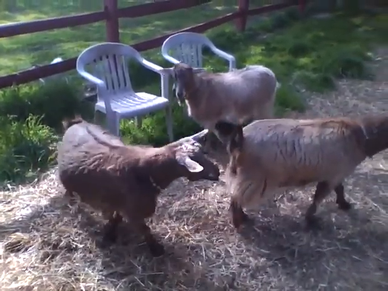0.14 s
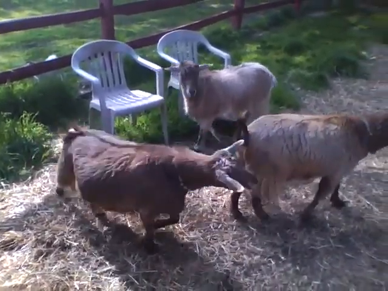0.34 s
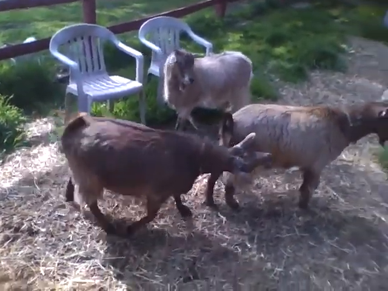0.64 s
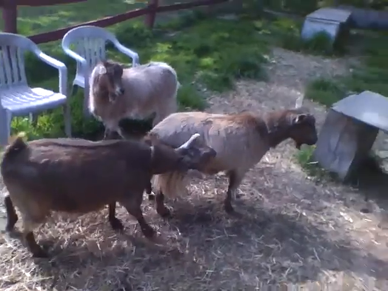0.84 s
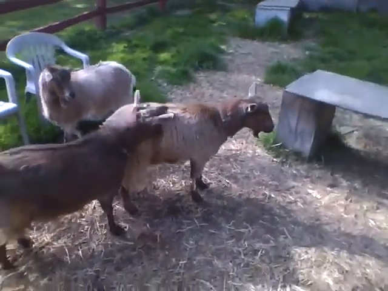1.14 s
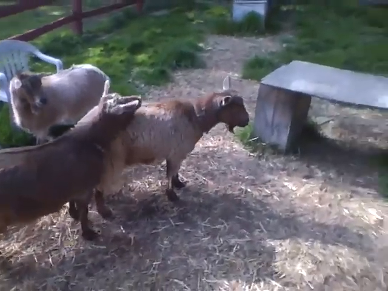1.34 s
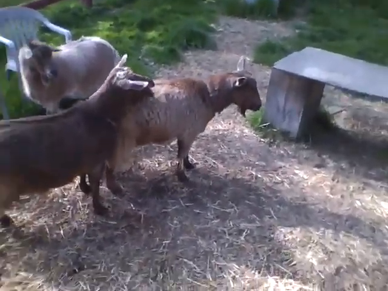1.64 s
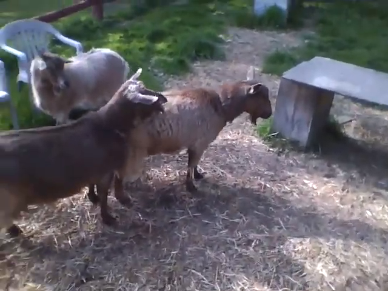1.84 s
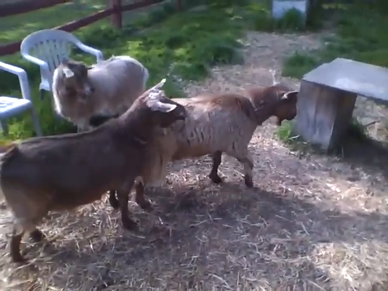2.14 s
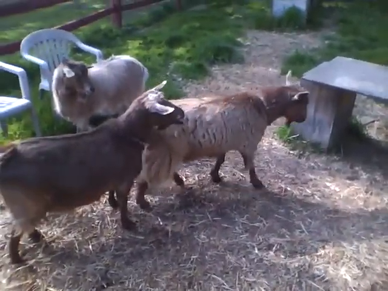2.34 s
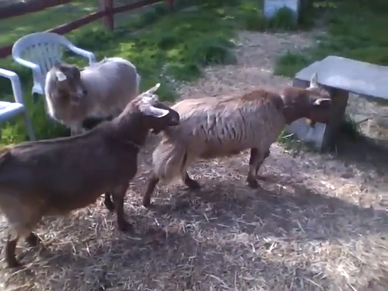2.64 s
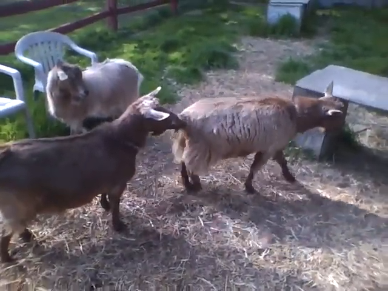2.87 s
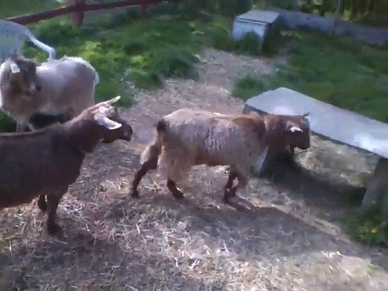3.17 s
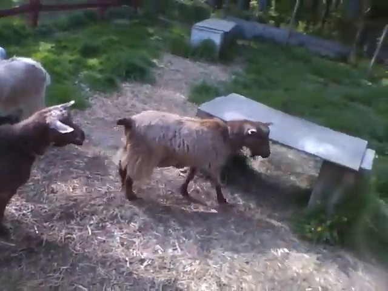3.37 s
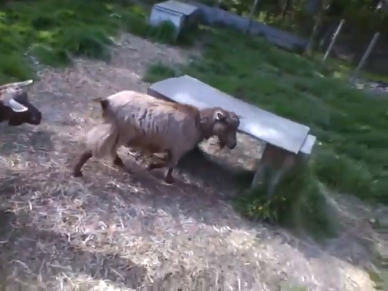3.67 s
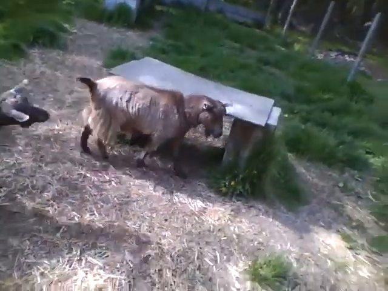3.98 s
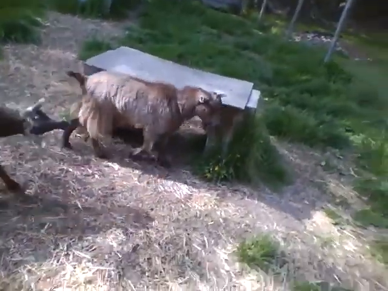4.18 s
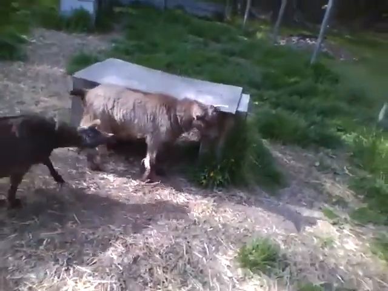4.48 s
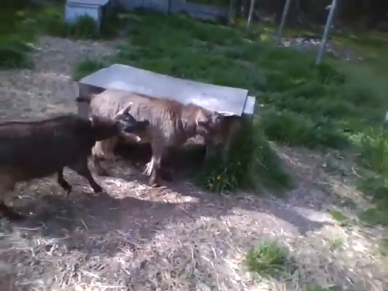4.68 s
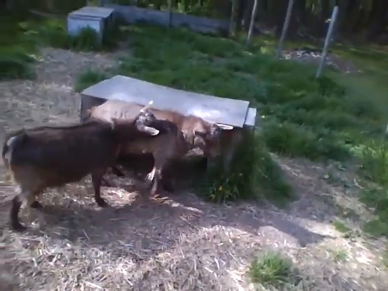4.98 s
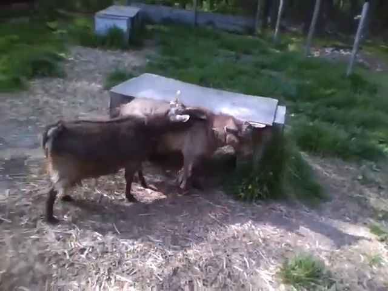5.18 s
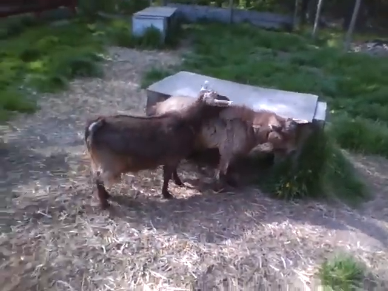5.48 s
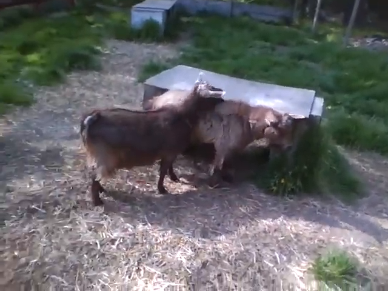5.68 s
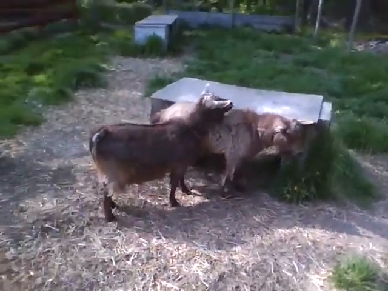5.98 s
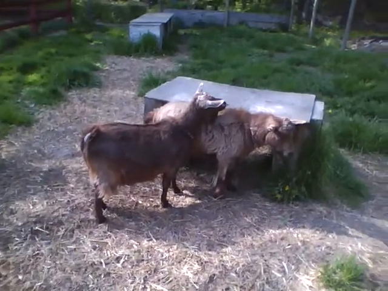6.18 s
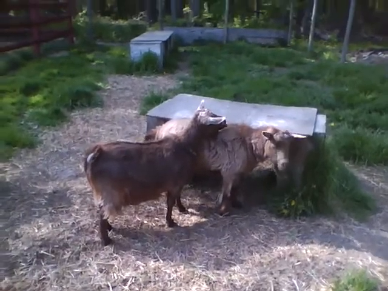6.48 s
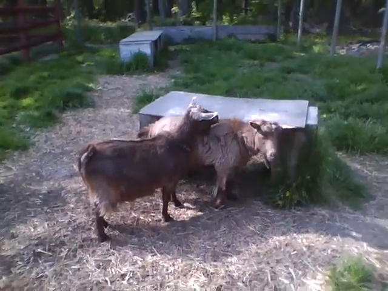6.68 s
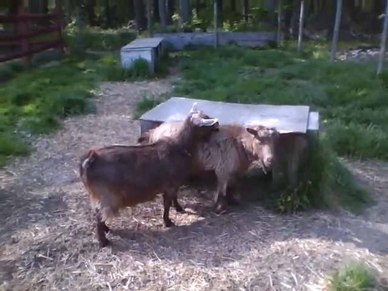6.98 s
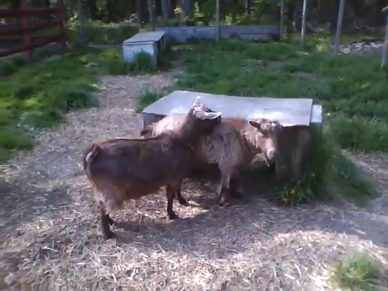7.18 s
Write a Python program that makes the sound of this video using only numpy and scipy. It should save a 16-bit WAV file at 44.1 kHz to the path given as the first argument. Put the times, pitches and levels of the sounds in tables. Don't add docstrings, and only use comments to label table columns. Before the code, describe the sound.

A goat close by gives a short hoarse stuttering bleat, then a longer broken one, amid crackling straw, hoof knocks and faint birds.

```python
import sys
import numpy as np
from scipy import signal
from scipy.fft import rfft, irfft
from scipy.io import wavfile
from scipy.ndimage import uniform_filter1d

SR = 44100
rng = np.random.default_rng(int(sys.argv[2]) if len(sys.argv) > 2 else 0)


def nominal_scale(level):
    x = np.asarray(level, float) / 20
    return 10 ** x


def dump(signal):
    limited = np.clip(np.atleast_2d(signal).T, -1, 1)
    pcm = np.round(limited * 32767).astype(np.int16)
    wavfile.write(sys.argv[1], SR, pcm)


N = 322812

FOLDS_HZ = 229
ATTACK_S, RELEASE_S, TAIL_S = 0.012, 0.011, 0.019
SHUT_DB = -48


def evened(x):
    return x / np.sqrt(np.mean(x ** 2) + 1e-20)


def smooth_twice(x, size):
    return uniform_filter1d(uniform_filter1d(x, size), size)


def add(mix, s, sound):
    part = mix[round(s * SR):][:len(sound)]
    part += sound[:len(part)]


def read(points, hz):
    f, value = np.transpose(points)
    return np.interp(np.log(hz + 1), np.log(f + 1), value)


def resonate(x, hz, width):
    turn = np.exp(2j * np.pi * np.cumsum(hz * np.ones(len(x))) / SR)
    r = np.exp(-np.pi * width / SR)
    return 2 * (turn * signal.lfilter([1 - r], [1, -r], x / turn + 1e-18)).real


def noise(spectrum, patchy_db):
    frames, hz = N // 128 + 5, np.fft.rfftfreq(512, 1 / SR)
    a, b, patches = rng.standard_normal((frames, 257, 3)).T
    patches = evened(uniform_filter1d(uniform_filter1d(patches, 16, 0), 12, 1))
    z = (a + 1j * b) * nominal_scale(read(spectrum, hz)[:, None] + patchy_db * patches)
    return evened(signal.istft(z, nperseg=512, noverlap=384)[1][:N])


def background():
    # pitch_hz, level_db [dB per Hz]
    hiss_colour = [(13, -56), (22, -28.5), (87, -5.5), (156, -20), (189, -4), (286, -15.5), (469, -13),
                   (815, -13.5), (988, -9.5), (1410, -18.5), (4140, -19.5), (4760, -20.5), (16000, -24)]
    # pitch_hz, level_db
    hum_lines = [(188.4, -71.5), (495.3, -92.5)]
    # time_s, level_db
    rumble = [(0.0, -68), (0.35, -65.5), (0.79, -63), (1.24, -63.5), (1.34, -62), (2.47, -69), (3.65, -69),
              (4.18, -57.5), (4.47, -64), (4.89, -62), (6.08, -63.5), (6.4, -65.5), (6.56, -63),
              (7.32, -68)]
    hums = sum(nominal_scale(db) * evened(resonate(rng.standard_normal(N), hz, 4.9)) for hz, db in hum_lines)
    air = nominal_scale(-56.5) * noise(hiss_colour, patchy_db=0.97)
    low = signal.sosfiltfilt(signal.butter(2, 500, fs=SR, output="sos"), air)
    s, db = np.transpose(rumble)
    swell = nominal_scale(np.interp(np.arange(N) / SR, s, db - db[-1]))
    no_subsonic = signal.butter(2, 35, "high", fs=SR, output="sos")
    return signal.sosfilt(no_subsonic, air - low + swell * (low + hums))


def rustle():
    # pitch_hz, level_db [dB per Hz]
    straw_colour = [(710, -50), (1200, -8.5), (1310, -2.5), (1750, -3.5), (2530, -3.5), (3400, -3),
                    (6370, -0.5), (16000, -7)]
    # peak_s, level_db, rise_s [over 20 dB], fall_s [over 20 dB]
    steps = [(0.189, -52, 0.85, 0.86), (.59, -49.5, 0.31, 0.065), (.9, -47, 0.8, 0.34),
             (1.076, -50, 0.11, 0.086), (1.236, -59.5, 0.25, 0.19), (1.96, -64.5, 0.19, 0.46),
             (2.21, -57, 0.049, 0.38), (2.48, -52.5, 0.071, 0.11), (2.66, -61, 0.18, 1.3),
             (3.03, -53.5, 0.022, 0.3), (3.28, -54, 0.2, 0.72), (3.61, -60.5, 0.13, 0.35),
             (3.869, -50.5, 0.23, 0.44), (4.0, -50, .08, 0.16), (4.17, -49, 0.15, 1),
             (4.42, -51.5, .3, 0.89), (4.82, -46.5, 0.08, 0.043), (4.95, -60, 0.042, .06),
             (5.1, -56, 0.19, 0.27), (5.488, -55.5, 0.03, 0.069)]
    cracks = nominal_scale(8.2 * np.minimum(rng.exponential(1, N), 5))
    cracks = cracks * (rng.random(N) < 300 / SR)
    grain = 1 + 0.251 * evened(signal.lfilter([1], [1, -0.97], cracks))
    slips = nominal_scale(2.1 * evened(smooth_twice(rng.standard_normal(N), 900)))
    t, power = np.arange(N) / SR, 0
    for s, db, rise, fall in steps:
        fade_db = 20 * np.maximum((s - t) / rise, (t - s) / fall)
        power = power + nominal_scale(2 * (db + 1.5 - fade_db))
    return np.sqrt(power) * evened(grain * slips * noise(straw_colour, patchy_db=0.7))


def birds(mix):
    # time_s, pitch_hz, level_db
    whistles = [
        [(2.38, 4670, -68.5), (2.4, 4580, -54.5), (2.42, 4300, -66)],
        [(2.405, 4260, -66), (2.46, 3980, -62), (2.54, 4170, -62), (2.6, 4050, -60.5), (2.68, 3990, -65.5),
         (2.76, 4220, -69)],
        [(0.02, 2420, -69.5), (0.03, 2490, -63), (0.192, 2550, -67), (0.2, 2735, -76)],
        [(2.39, 2250, -70.5), (2.42, 2030, -71), (2.52, 2080, -67.5), (2.555, 2060, -75), (2.6, 2030, -61),
         (2.63, 2010, -69)],
        [(2.42, 2470, -70), (2.46, 2450, -68.5), (2.49, 2490, -76), (2.53, 2490, -64.5), (2.55, 2500, -74)],
        [(2.15, 2550, -72), (2.27, 2590, -69.5)],
        [(6.32, 515, -76), (6.356, 514, -59), (6.4, 518, -69.5)],
        [(6.5, 610, -67.5), (6.528, 610, -60), (6.56, 600, -66)],
    ]
    for rows in whistles:
        s, *columns = np.transpose(rows)
        t = np.arange(s[0], s[-1], 1 / SR)
        hz, db = (np.interp(t, s, c) for c in columns)
        add(mix, s[0], whistle(hz, db))


def whistle(hz, db):
    breath = resonate(rng.standard_normal(len(hz)), hz, 0.024 * hz.mean())
    tone = resonate(breath, hz, 0.04 * hz.mean())
    tone = tone / np.sqrt(abs(uniform_filter1d(tone ** 2, size=900)) + 1e-12)
    return nominal_scale(db) * tone * signal.windows.tukey(len(hz), 0.05)


def snap(db, hz):
    t, f = np.arange(1024) / SR, np.fft.rfftfreq(1024, 1 / SR)
    crack = 0.12 * rng.standard_normal(1024) * nominal_scale(-60 * abs(t - 0.002) / 0.009)
    crack[60] += 1
    octaves_off = np.log2((f + 1) / hz)
    crack = irfft(rfft(crack) * np.exp(-abs(octaves_off / 1.3) ** 1.5))
    return nominal_scale(db) * crack / abs(crack).max()


def bump(db):
    u = (np.arange(2400) / SR - 0.014) / 0.0032
    return -nominal_scale(db + 1.0) * (1 - u ** 2) * np.exp(-0.5 * u ** 2)


def knock(db, hz):
    t = np.arange(3000) / SR - 0.002
    hollow = -np.sin(2 * np.pi * hz * t) * np.exp(-0.5 * ((t - 0.0024) / 0.0016) ** 2)
    thump = np.sin(2 * np.pi * 260 * t) * nominal_scale(-60 * t / 0.066) * np.clip(t / 0.0067, 0, 1)
    tick = evened(resonate(rng.standard_normal(3000), 890, 850)) * nominal_scale(-60 * abs(t - 0.001) / 0.013)
    echo = nominal_scale(-14) * np.roll(hollow, 720)
    return nominal_scale(db) * (hollow + echo + nominal_scale(-5.0) * thump + nominal_scale(-13.0) * tick)


def bleats():
    # folds_open_s, swell_s, hold_s, opening_effort_db, top_effort_db
    jerks = [(0.553, 0.0074, 0.0039, -45, -43), (0.61, 0.028, 0.032, -43, -15),
             (0.703, 0.044, 0.0032, -27.5, -22.5), (0.781, 0.045, 0.015, -22, -11),
             (.868, 0.013, 0.035, -23, -18), (0.96, 0.03, 0.018, -28.5, -12.5),
             (1.061, 0.041, 0.0098, -35.5, -26.5), (1.166, 0.021, 0.023, -26.5, -22.5),
             (1.27, 0.0034, 0.0085, -47, -41.5), (3.984, 0.091, 0.015, -58, -41),
             (4.113, 0.011, 0.031, -47, -29.5), (4.207, 0.024, 0.02, -28, -12),
             (4.3, 0.046, 0.0099, -39.5, -20.5), (4.383, 0.034, 0.016, -30, -17.5),
             (4.475, 0.043, 0.017, -31.5, -16), (4.565, 0.043, 0.0063, -26, -32.5),
             (4.649, 0.021, 0.042, -25.5, -21.5), (4.77, 0.026, 0.053, -35.5, -22),
             (4.989, 0.014, 0.011, -36, -46.5), (5.053, 0.013, 0.039, -28, -22),
             (5.123, 0.01, 0.0049, -55, -36), (5.15, 0.036, 0.019, -37, -19.5),
             (5.228, 0.021, 0.037, -49.5, -34.5), (5.34, 0.043, 0.012, -35, -21.5)]
    # throat_hz, mouth_hz, mouth_db, rasp_db, chest_db [all dB over throat]
    shapes = [(540, 1100, -2, -7, -9.5), (600, 1443, -6.5, -3.5, -29), (567, 1180, -14, -13.5, -23),
              (609.5, 1137, -8.5, -12, -41.5), (533, 1186, -1.5, -21, -34.5), (593, 1160, 1, -26, -36),
              (546, 1210, 4.5, -15, -15.5), (556, 954, -2, -28.5, -18.5), (560, 1155, -1.5, -8, -5),
              (589, 1067, -0.5, -5, -6.5), (600, 1180, -0.5, 3.5, -11), (708, 1417, -6.5, -7, -27.5),
              (582, 1300, -4, -4.5, -16), (656, 1474, 0.5, -5.5, -27), (651, 1415, -2, -6.5, -20.5),
              (604, 1380, 0.5, -6.5, -13), (620, 1360, -8.5, -4, -20.5), (570, 1373, -3, -10.5, -12.5),
              (630, 1370, -10, -16, -21), (595, 1157, -8.5, -21.5, -16.5), (575, 1270, -11, -22, -14),
              (646, 1184, -4.5, -18.5, -22), (485, 1115, -1, -19, -11), (657, 1013, -7.5, -28, -21.5)]
    # throat_glide [share], mouth_glide [share],
    # opening_burst_db, closing_burst_db [both of the rasp], sag_db [while held]
    moves = [(-0.14, 0.005, 10.5, -4, -15.5), (0.28, -0.032, 4.5, -7, -19), (-0.051, -0.22, 19, 8.5, -12.5),
             (0.12, 0.00087, 4.5, 0, -11.5), (-0.1, 0.17, 16.5, 1.5, -6), (-0.036, -0.051, 15.5, 2, -10),
             (0.038, -0.022, 8, 6.5, -8.5), (-0.093, 0.043, 13.5, 16, -7), (-0.12, -0.51, -4, 10.5, -10.5),
             (0.3, 0.11, -10, 25, -15), (-0.32, 0.22, 5.5, -2, -7.5), (0.024, -0.09, 7.5, 4.5, -15.5),
             (0.094, 0.093, 6.5, 3, -18.5), (-0.082, 0.012, 13, -2, -8.5), (0.18, 0.044, 5, -3.5, -13),
             (-0.25, 0.206, 15, 13, -1.5), (0.096, -0.073, -5.5, 1, 0.5), (0.066, 0.049, 9, -8, -11.5),
             (0.106, -0.3, 7.5, -5, 0), (-0.15, 0.066, -2, 16, -12.5), (-0.18, -0.057, 22, 6, -0.5),
             (-0.0035, 0.046, -8, -4, -19), (0.013, -0.03, 18, 6.5, 0.5), (-0.039, -0.022, 14, 13, -10)]
    # start_s, peak_db
    creaks = [
        (4.043, -27),
        (4.055, -24),
        (4.065, -21),
        (4.074, -25),
        (4.106, -30),
        (4.1106, -23),
    ]
    # start_s, peak_db, ring_hz
    slaps = [(0.6123, -19, 2620), (0.6178, -16, 2650), (0.6318, -10, 3400), (0.7022, -8, 3200),
             (0.742, -16.5, 3770), (0.7844, -10.5, 2430), (0.7894, -13.5, 2360), (0.8690, -15, 3680),
             (0.9665, -22.5, 2130), (1.0545, -32, 3100), (.6446, -6, 2400), (.6536, -8.5, 2606),
             (4.238, -8.5, 3500), (4.513, -12, 1590), (4.1094, -17, 2870), (4.1188, -9.5, 2170),
             (4.2061, -7, 2940), (4.2096, -3, 2200), (4.2984, -21, 2170), (4.3428, -7, 3420),
             (4.3822, -23, 2300), (4.4052, -18, 2340), (4.474, -14, 2510), (4.5089, -9.5, 3400),
             (4.5623, -9, 2130), (4.6092, -21, 3570), (4.6496, -23, 2310), (4.697, -6, 3400),
             (4.7669, -33, 2400), (4.7728, -21, 2310), (5.0597, -32, 3650), (5.1016, -26, 2390),
             (5.146, -24.5, 2340), (5.2293, -31, 4110), (5.2353, -29, 2860), (5.383, -27, 3850)]
    goat, drive = np.zeros(N), folds()
    for jerk in zip(jerks, shapes, moves):
        add(goat, *syllable(*jerk, drive))
    for s, db in creaks:
        add(goat, s, creak(db))
    for s, db, hz in slaps:
        add(goat, s, slap(db, hz))
    return flare_and_dip(goat)


def folds():
    jitter, shimmer_db, rough, steady_air, edge_db = 0.3, 2, 0.66, 0.6, 2
    wander = evened(uniform_filter1d(rng.standard_normal(N), 260))
    turns = np.cumsum(FOLDS_HZ * np.exp(jitter * wander)) / SR
    cycle, phase = turns.astype(int), turns % 1
    chance, more_chance = rng.standard_normal((2, N // 40))
    air = rng.standard_normal(N)
    strength = nominal_scale(shimmer_db * chance[cycle])
    slaps = np.diff(cycle, prepend=0) * strength
    puffs = (steady_air + np.exp(-phase / 0.5)) * strength * air
    sharp_air = (0.5 + np.exp(-phase / 0.2)) * air
    edges = nominal_scale(edge_db * more_chance[cycle]) * (0.9 * evened(slaps) + evened(sharp_air))
    return np.array([(1 - rough) * evened(slaps) + rough * evened(puffs), edges])


def effort(swell, hold, opening_db, top_db, sag_db):
    silent_db, leak_db = -76.5, -71.5
    t = np.arange(-ATTACK_S, swell + hold + RELEASE_S + TAIL_S, 1 / SR)
    at = np.cumsum([-ATTACK_S, ATTACK_S, swell, hold, RELEASE_S, TAIL_S])
    stage = np.interp(t, at, np.arange(len(at)))
    bend = np.array([1, 0.72, 1, 1, 1, 1])[stage.astype(int)]
    end_db = top_db + sag_db
    db = [silent_db, opening_db, top_db, end_db, min(SHUT_DB, end_db), leak_db]
    return t, np.interp(np.floor(stage) + (stage % 1) ** bend, np.arange(len(at)), db)


def ring(x, hz, width, skirt, size=500):
    drifts = smooth_twice(rng.standard_normal((2, SR // 4)), 500)
    bend, flare = (evened(v)[:len(x)] for v in drifts)
    hz = hz * (1 + 0.02 * bend)
    y = resonate(resonate(x, hz, width), hz, skirt)
    return nominal_scale(2 * flare - 0.3) * y / np.sqrt(abs(uniform_filter1d(y ** 2, size=size)) + 1e-12)


def syllable(jerk, shape, move, drive):
    # time_s, low_rasp_hz, high_rasp_hz, high_db [over low], nose_db [over rasp]
    upper_throat = [(0.549, 2000, 3950, 5, -5.5), (.61, 2320, 3350, 1, -25), (.7, 2166, 3350, 0.5, -11),
                    (.79, 2410, 3120, -12, -30), (.87, 2710, 3590, 4.5, -16), (.96, 2150, 3860, -8, -13),
                    (1.05, 2150, 3810, 5.5, -9.5), (1.16, 1830, 4230, -3, -5.5),
                    (1.27, 2450, 3920, -23.5, -18), (3.98, 2616, 3030, -4, -27),
                    (4.11, 2220, 3500, -10, -19), (4.21, 2070, 3170, 2.5, -23),
                    (4.47, 2370, 3450, -2, -19.5), (4.78, 2260, 3550, -3.5, -15), (5.05, 2330, 3730, 0, -9),
                    (5.15, 2320, 3670, 3, -15), (5.23, 2840, 4120, 0, -11), (5.34, 2110, 4020, 5, -10)]
    mouth_follows, rasp_follows = 0.89, 0.72
    slap_s, mouth_slap = 0.00902, 0.062
    opened, swell, hold, opening_db, top_db = jerk
    throat_hz, mouth_hz, mouth_db, rasp_db, chest_db = shape
    throat_glide, mouth_glide, open_db, close_db, sag_db = move
    t, db = effort(swell, hold, opening_db, top_db, sag_db)
    s, length = opened - ATTACK_S, swell + hold
    along = np.clip(2.57 * (t / length - 0.5), -0.5, 0.5)
    at, *columns = np.transpose(upper_throat)
    low_hz, high_hz, high_db, nose_db = (np.interp(opened, at, c) for c in columns)

    under_db = db.max() - np.maximum(db, SHUT_DB)
    burst_db = open_db * np.exp(-(t / slap_s) ** 2) + close_db * np.exp(-((t - length) / slap_s) ** 2)
    mouth_db = mouth_db + (1 - mouth_follows) * under_db + mouth_slap * burst_db
    rasp_db = rasp_db + (1 - rasp_follows) * under_db + burst_db
    high_db = high_db + 2 * 2.5 * along
    throat_hz = throat_hz * (1 + throat_glide * along)
    mouth_hz = mouth_hz * (1 + mouth_glide * along)

    x, edge = drive[:, round(s * SR):][:, :len(db)]
    chest_level = nominal_scale(chest_db + db.max() + 0.61 * (db - db.max()))
    chest = chest_level * ring(x, FOLDS_HZ, 90, 78)
    throat = nominal_scale(db) * ring(x, throat_hz, 70, 170, size=420)
    side = nominal_scale(-12.0) * np.clip((mouth_hz - 1010) / 350, 0, 1)
    mouth = ring(x, mouth_hz, 100, 350, size=440) - side * ring(x, 957, 160, 227.0)
    mouth = nominal_scale(db + mouth_db) * mouth
    low = ring(edge, low_hz, 190, 750, size=400)
    low = low - nominal_scale(-8.0) * ring(edge, 1.287 * low_hz, 200, 500, size=700)
    high = ring(edge, high_hz, 220, 550, size=400)
    high = high - nominal_scale(-8.0) * ring(edge, 1.204 * high_hz, 349.4, 1000, size=700)
    rasp = (low + nominal_scale(high_db) * high) / np.sqrt(2.4 + nominal_scale(2 * high_db))
    rasp += nominal_scale(nose_db) * ring(edge, 5190, 860, 1100, size=400)
    rasp += nominal_scale(-34) * ring(edge, 7500, 3000, 6000, size=900)
    voice = chest + throat - mouth + nominal_scale(db + rasp_db) * rasp
    return s, voice * signal.windows.tukey(len(db), 0.06)


def slap(db, hz):
    t = np.arange(500) / SR
    spike = -np.exp(-0.5 * ((t - 0.0006) / 0.00008) ** 2)
    ringing = resonate(spike, hz, 500) / (1 - np.exp(-np.pi * 500 / SR))
    y = 0.6 * (spike - uniform_filter1d(spike, size=60)) + 0.15 * ringing
    return nominal_scale(db - 4.5) * y / abs(y).max()


def flare_and_dip(voice):
    # time_s, ring_hz, half_length_s, change_db
    short_bleat = [(0.623, 4180, 0.008, -8), (0.625, 560, 0.0033, -7.5), (0.643, 1420, 0.017, -5),
                   (0.655, 1940, 0.00793, 10), (0.702, 3270, 0.01487, 3.5), (0.707, 5300, 0.015, -15.5),
                   (0.711, 1680, 0.008, 10.5), (0.715, 1160, 0.016, -10.5), (0.742, 4690, 0.008, 8),
                   (0.75, 3400, 0.015, -8), (0.782, 690, 0.008, -11), (0.784, 390, 0.0086, -12),
                   (0.792, 1680, 0.015, 7.5), (0.804, 2760, 0.015, 2.5), (0.829, 390, 0.015, 8.5),
                   (0.832, 730, 0.008, 4.5), (0.836, 2330, 0.015, -4), (0.842, 1210, 0.004, -14),
                   (0.877, 1080, 0.008, -9), (0.879, 2110, 0.015, 9), (0.899, 1250, 0.004, 5.5),
                   (0.964, 4910, 0.0099, -2), (0.968, 4310, 0.015, 16), (1.012, 950, 0.004, -25),
                   (1.056, 390, 0.0044, 13.5), (1.065, 3100, 0.02, 13), (1.067, 1210, 0.02, -18),
                   (1.112, 1720, 0.015, 11), (1.165, 390, 0.009, -7)]
    # time_s, ring_hz, half_length_s, change_db
    long_bleat = [(4.091, 3320, 0.004, -17), (4.12, 1230, 0.008, -9), (4.152, 3100, 0.008, 6),
                  (4.226, 690, 0.003, -7), (4.233, 2280, 0.0037, -6), (4.237, 745, 0.0065, 5),
                  (4.249, 3530, 0.008, 6.5), (4.319, 3200, 0.014, -9), (4.348, 4800, 0.015, 11),
                  (4.393, 4090, 0.012, -13), (4.405, 2420, 0.0053, 11.5), (4.406, 1010, 0.017, 9),
                  (4.415, 1520, 0.009, -10), (4.429, 4280, 0.008, 14), (4.432, 5880, 0.012, 15),
                  (4.47, 1510, 0.0073, -14), (4.474, 2390, 0.0072, 7.5), (4.476, 3830, 0.0073, 8),
                  (4.52, 695, 0.0021, -7), (4.522, 3700, 0.015, 4.5), (4.522, 4360, 0.0072, -7.5),
                  (4.525, 1680, 0.011, 2), (4.528, 2410, 0.013, -6.5), (4.542, 2970, 0.011, 9),
                  (4.561, 5170, 0.015, -12.5), (4.581, 1420, 0.01, -11), (4.614, 1450, 0.006, 9.5),
                  (4.614, 2900, 0.008, -6.5), (4.614, 4650, 0.008, -14), (4.65, 3900, 0.019, 13),
                  (4.651, 690, 0.0063, -7), (4.665, 4550, 0.0091, -13), (4.677, 3070, 0.01, -24),
                  (4.709, 390, 0.011, -16), (4.712, 2070, 0.003, -15), (4.701, 3500, 0.0052, 5),
                  (4.772, 1450, 0.02, 11), (4.778, 3770, 0.008, -4), (4.82, 3920, 0.008, 13.5),
                  (4.835, 2370, 0.014, 11.5), (4.838, 1380, 0.015, -15), (4.846, 4310, 0.014, -8),
                  (5.06, 5340, 0.014, -6), (5.066, 4200, 0.011, 16.5), (5.104, 3940, 0.018, -15),
                  (5.14, 4800, 0.025, -20), (5.169, 5380, 0.016, 11), (5.182, 4780, 0.015, -8),
                  (5.339, 1770, 0.006, -15.5), (5.393, 600, 0.0093, -3.5)]
    hz, t, z = signal.stft(voice, SR, nperseg=384, noverlap=320)
    s, ring_hz, half, db = np.transpose(short_bleat + long_bleat)
    across = np.exp(-0.5 * ((hz[:, None] - ring_hz) / (90 + 0.043 * ring_hz)) ** 2)
    along = np.exp(-0.5 * ((t - s[:, None]) / half[:, None]) ** 2)
    return signal.istft(z * nominal_scale((db * across) @ along), SR, nperseg=384, noverlap=320)[1][:N]


def yard(x):
    # pitch_hz, fade_s [time to fall 60 dB]
    fading = [(250, 0.63), (1000, 0.94), (2500, 0.93), (8000, 0.7)]
    taps = np.zeros(SR)
    at = np.arange(500, SR - 20, 20)
    taps[at + rng.integers(0, 20, len(at))] = rng.choice([-1., 1.], len(at))
    hz, t, z = signal.stft(taps, SR, nperseg=256)
    tail = signal.istft(z * nominal_scale(-60 * t / read(fading, hz)[:, None]), SR, nperseg=256)[1]
    return signal.fftconvolve(x, tail / np.linalg.norm(tail))[:N]


def tap(db, hz):
    t = np.arange(1024) / SR
    y = np.sin(2 * np.pi * hz * t) * nominal_scale(-60 * t / 0.0082)
    y += 0.99 * np.exp(-0.5 * ((t - 0.0003) / 0.00006) ** 2)
    y += 0.03 * rng.standard_normal(1024) * nominal_scale(-60 * t / 0.01)
    return nominal_scale(db - 5) * y / abs(y).max()


def creak(db):
    # ring_hz, width_hz, level_db
    throat_rings = [(690, 140, -3.5), (1155, 590, -0.5), (2870, 360, 1.5), (3500, 300, -11)]
    puff = rng.standard_normal(600) * np.exp(-np.arange(600) / SR / 0.0022)
    y = np.zeros(600)
    for hz, width, ring_db in throat_rings:
        y += nominal_scale(ring_db) * evened(resonate(resonate(puff, hz, width), hz, 2 * width))
    return nominal_scale(db) * y / abs(y).max()


def scene():
    # start_s, peak_db, centre_hz
    snaps = [(0.0344, -34.5, 2520), (0.3411, -28.5, 2460), (0.3514, -31.5, 5500), (0.394, -32, 5540),
             (0.4149, -23, 5700), (1.8088, -33.5, 3300), (1.9535, -31.5, 4900), (1.9789, -31, 5140),
             (2.4828, -30.5, 2020), (2.6694, -38.5, 4240), (2.8894, -37, 2756), (3.03, -30, 2760),
             (3.0515, -29.5, 5670), (3.2166, -30.5, 3660), (3.5818, -30.5, 5300), (3.5982, -34.5, 2580),
             (3.7668, -32.5, 3930), (5.4849, -31.5, 6740), (3.6501, -24.5, 4740), (4.5381, -25, 7500),
             (4.69, -27.5, 8000), (4.819, -24.5, 8000)]
    # trough_s, peak_db
    bumps = [
        (0.376, -54.5),
        (2.244, -54.5),
        (2.679, -46.5),
        (4.34, -35),
        (6.228, -47),
        (6.261, -43),
        (6.315, -46),
        (6.56, -50),
        (6.909, -54),
    ]
    # start_s, peak_db, ring_hz
    knocks = [(0.434, -40.5, 540), (1.534, -39, 451), (1.731, -29, 500), (1.923, -39.5, 454),
              (2.149, -46.5, 442), (3.756, -47, 511), (5.568, -40.5, 510), (5.748, -33, 497),
              (5.959, -34.5, 513), (6.164, -42, 474), (6.408, -44.5, 460), (6.628, -49.5, 493)]
    # start_s, peak_db, ring_hz
    taps = [
        (3.68, -36, 800),
        (3.741, -31, 700),
        (5.6865, -31, 990),
        (5.7253, -33.5, 1290),
        (5.8097, -33.5, 1300),
        (6.4496, -25.5, 1050),
        (6.5026, -27, 945),
    ]
    pen = background() + rustle()
    birds(pen)
    for events, source in ((snaps, snap), (knocks, knock), (taps, tap)):
        for s, db, hz in events:
            add(pen, s, source(db, hz))
    for s, db in bumps:
        add(pen, s - 0.014, bump(db))
    goat = bleats()
    return (goat + nominal_scale(-24.5) * yard(goat) + pen)[None]


def roll_off(x):
    return signal.sosfilt(signal.butter(12, 15890, fs=SR, output="sos"), x)


def record(dry):
    no_bass = signal.butter(2, 90, "high", fs=SR, output="sos")
    soft = dry + signal.sosfilt(no_bass, np.tanh(dry) - dry)
    treble_limit = signal.firwin(1023, 15860, window=("kaiser", 9), fs=SR)
    mix = signal.oaconvolve(soft, treble_limit[None], "same")
    return roll_off(mix)


dry = scene()
out = record(dry)
dump(out)
```